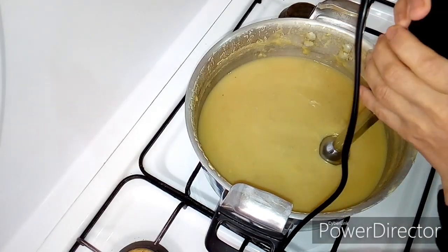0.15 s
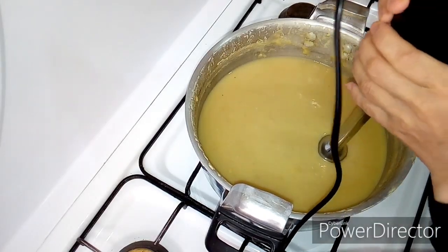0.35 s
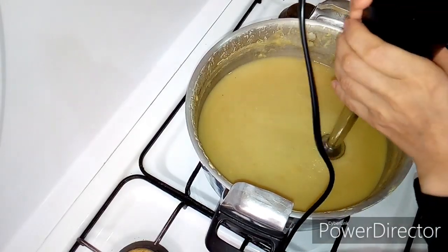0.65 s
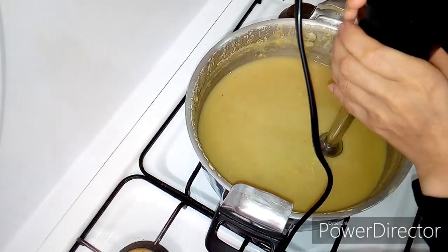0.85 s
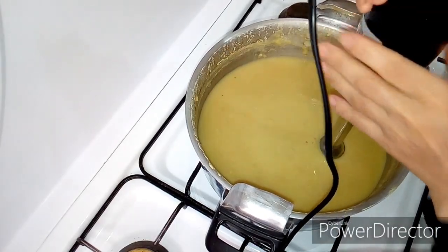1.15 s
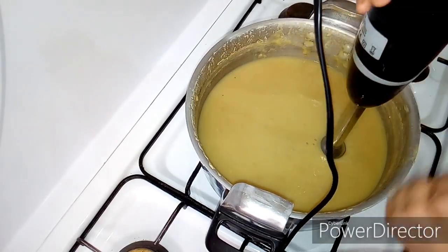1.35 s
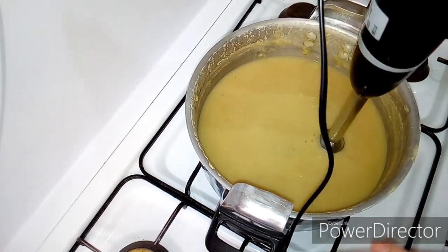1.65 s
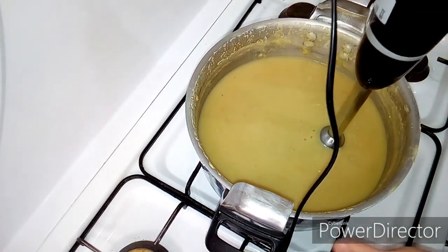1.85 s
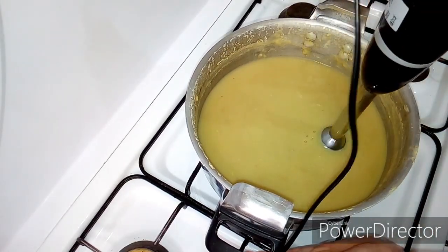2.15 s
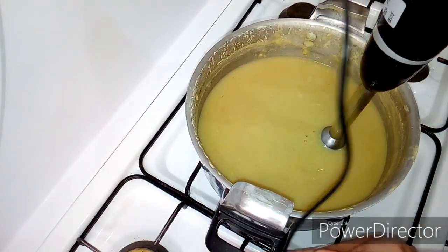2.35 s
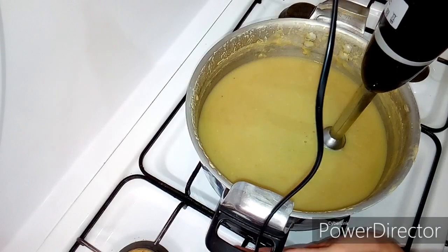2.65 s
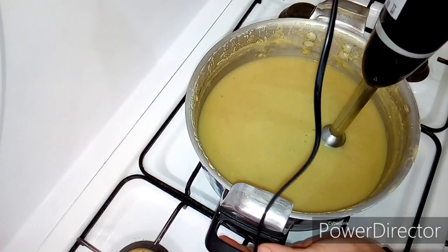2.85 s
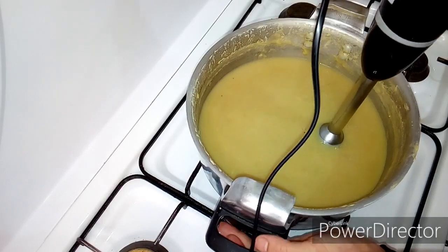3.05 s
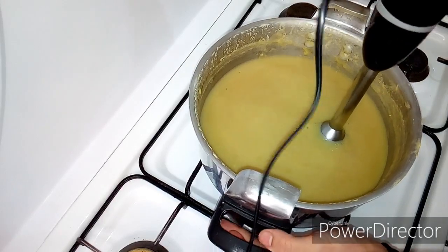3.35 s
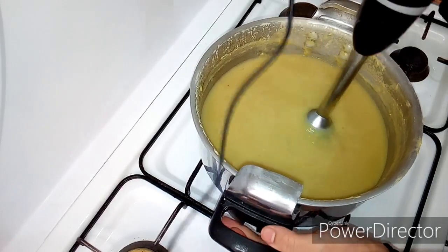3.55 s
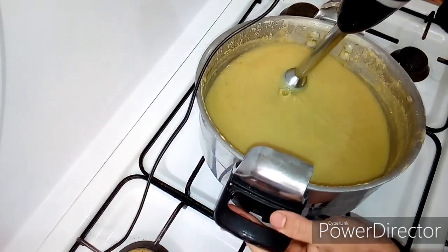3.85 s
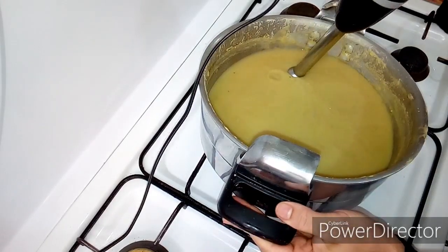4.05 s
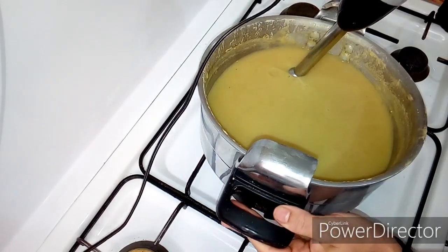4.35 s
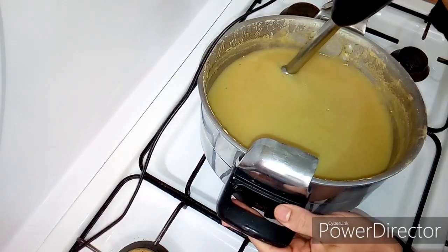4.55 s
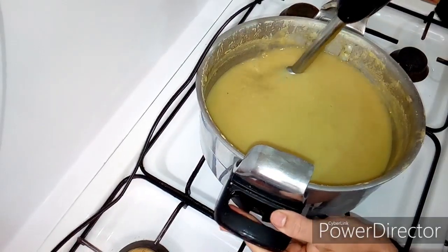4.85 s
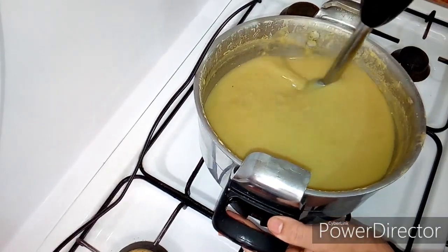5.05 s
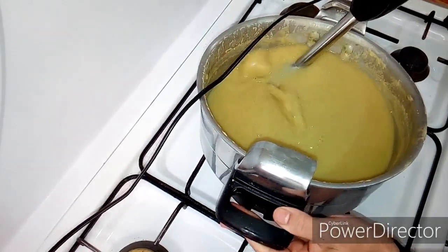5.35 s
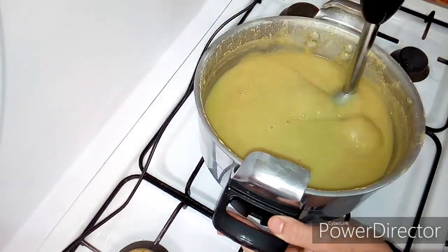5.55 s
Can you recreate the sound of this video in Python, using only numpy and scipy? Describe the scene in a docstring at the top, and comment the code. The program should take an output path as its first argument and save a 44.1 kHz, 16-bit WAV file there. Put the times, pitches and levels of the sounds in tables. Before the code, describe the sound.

At the very start, two quick knocks sound as a stick blender whines up to speed in a steel pot of thick puree, close by in a home kitchen. The buzzing, slightly rattly motor switches off at about 0.8 seconds and coasts down, falling in pitch and fading by about 1.5 seconds. A faint hiss and low electrical hum remain. From about 2.2 to 4 seconds, a hand takes hold of the pot with soft bumps, small metallic ticks and light rubs. At about 4.1 seconds the switch snaps and the blender starts again, lower and less even in pitch. A wet churning builds from around 4.4 seconds as the blade works deep in the puree. At about 5.1 seconds the blender hits the pot in a quick cluster of loud knocks, and the sound ends abruptly at 5.2 seconds.

```python
"""With two quick knocks a stick blender whines up to speed in a steel pot of bean puree, then coasts down.
A hand takes hold of the pot with small ticks and bumps over kitchen hiss and a faint mains hum.
Pushed deep, the blender starts again, churns and knocks against the pot until the sound ends abruptly.
The whine is the harmonic series of one push per shaft turn; bearings and brushes add noise pulsed at
the same rate, and collapsing air pockets excite the modes of the pot."""
import sys
import numpy as np
from scipy import signal
from scipy.fft import rfft, irfft
from scipy.io import wavfile

SR = 44100
rng = np.random.default_rng(int(sys.argv[2]) if len(sys.argv) > 2 else 0)


def waveform_to_disk(signal):
    """Save audio, clipped to [-1, 1], as 16-bit WAV at the path in sys.argv[1]."""
    frames = np.transpose(np.atleast_2d(signal))
    scaled = np.clip(frames, -1, 1) * 32767
    samples = np.round(scaled).astype(np.int16)
    wavfile.write(sys.argv[1], SR, samples)


N = 251325
T = np.arange(N) / SR
OFF_S, RESTART_S = .8, 4.062  # the first run is switched off, the second on
FREE_FULL_S, DEEP_FULL_S = (.5, .8), (4.3, 5.1)  # each run's stretch at full speed
RATTLE_KNEE_HZ, HISS_KNEE_HZ = 126.7, 166  # shaft speeds below which these noises die away
HUM_HZ, HUM_WAVER_DB = 100, 1.8  # twice the mains frequency; spread of the hum's level


def undb(db):
    """Decibels to amplitude ratio."""
    return 10 ** (np.asarray(db) / 20)


def unit(x):
    """Normalisation to rms 1."""
    return x / np.sqrt(np.mean(x ** 2))


def steady(x, span):
    """Normalisation to rms 1 within a span of time."""
    return x / np.std(x[(T > span[0]) & (T < span[1])])


def curve(rows):
    """Linear interpolation between (seconds, value) points."""
    return np.interp(T, *np.transpose(rows))


def onset(start, length):
    """Linear ramp from 0 to 1, then held."""
    return np.clip((T - start) / length, 0, 1)


def swell(s, half):
    """Gaussian envelope centred on s, with a standard deviation of half seconds."""
    return np.exp(-((T - s) / half) ** 2 / 2)


def decay(start, t60):
    """Exponential decay of a damped vibration after a blow."""
    return (T >= start) * np.exp(-np.log(1000) * np.clip((T - start) / t60, 0, 2))


def knee(speed, hz, slope):
    """Gain that is level at high speed and falls as a power law below the knee."""
    return 1 / (1 + (hz / speed) ** slope)


def noise():
    """Gaussian white noise."""
    return rng.standard_normal(N)


def walk(rate):
    """Random wander through rate points a second, with a spread near 1."""
    return np.interp(T * rate, np.arange(N), noise()) * 1.2


def colour(x, points):
    """Minimum-phase filter of unit power gain, shaped by (Hz, relative dB) points."""
    hz, db = np.transpose(points)
    grid = np.linspace(1, SR / 2, 2049)
    grid_db = np.interp(np.log(grid), np.log(np.append(hz, SR / 2)), np.append(db, db[-1] - 31))
    cepstrum = irfft(np.log(undb(grid_db)))
    causal_fold = 1 + np.sign(np.fft.fftfreq(len(cepstrum)))
    response = irfft(np.exp(rfft(cepstrum * causal_fold)))
    return signal.fftconvolve(x, response / np.linalg.norm(response))[:N]


def resonance(x, hz, width):
    """Second-order resonator with gain 1 at its centre."""
    return signal.lfilter(*signal.iirpeak(hz, hz / width, fs=SR), x)


def narrow(x, hz, width):
    """Two resonators in cascade, for steeper skirts."""
    return resonance(resonance(x, hz, width), hz, width)


def kitchen():
    """Noise floor: broadband hiss, faint narrow-band whistles and wavering harmonics of the mains."""
    # Each row: frequency in Hz, relative level of the hiss in dB.
    air_spectrum = [(25, -15), (65, -15), (95, 0.5), (130, -9.5), (250, -8.5), (500, -7), (900, -8),
                    (1900, -12), (3200, -12.5), (4500, -11), (6000, -15.5), (7500, -24.5), (10000, -26.5),
                    (15500, -27)]
    # Each row: centre in Hz, width in Hz, level in dB once faded in.
    whistle_bands = [(2748, 180, -74), (4510, 250, -81.5)]
    # Each row: frequency in Hz, level in dB before the hum's swell is applied.
    hum_partials = [(100, -75), (199.5, -74.5), (300, -75), (399, -74), (500, -85.5), (798, -81)]
    dip_db = 2.4 * swell(2.56, 0.32)
    air = colour(noise(), air_spectrum) * undb(-64 - dip_db + .5 * walk(8))
    whistles = sum(undb(db) * unit(narrow(noise(), hz, width)) for hz, width, db in whistle_bands)
    hum = sum(undb(db + HUM_WAVER_DB * walk(3.3)) * np.sin(2 * np.pi * hz * T + 0.73 * walk(21))
              for hz, db in hum_partials)
    return air + whistles * onset(0, 3.2) + np.sqrt(2) * hum * (0.34 + swell(2.95, .42))


def room(x, wet_db, t60):
    """Reverberation: the tiled kitchen adds a short diffuse tail, mostly treble."""
    tail = resonance(noise() * decay(0.0059, t60), 3700, 5800)[:SR // 2]
    return x + undb(wet_db) * signal.fftconvolve(x, tail / np.linalg.norm(tail))[:N]


def reflect(x, wall, stove):
    """Comb filtering: treble reflected by pot wall and stove top interferes, shifting as the hand sways."""
    wall_s, stove_s, sway = 0.000771, 0.0021, .12
    treble = signal.sosfilt(signal.butter(1, 2000, "high", fs=SR, output="sos"), x)
    late = [np.interp(T - delay * (1 + sway * walk(2.5)), T, treble) for delay in (wall_s, stove_s)]
    return (x + wall * late[0] + stove * late[1]) / np.sqrt(1 + wall ** 2 + stove ** 2)


def handling():
    """Impact and friction: a hand bumps the handle, cord and pot tick, hand and cord slide."""
    # Each row: start in seconds, level in dB, t60 in seconds.
    bumps = [(2.225, -58.5, 0.12), (2.452, -55.5, 0.088), (2.542, -57, 0.18), (3.253, -49.5, 0.089),
             (3.299, -52, 0.14), (3.345, -52.5, 0.25), (3.382, -49.5, 0.23), (3.409, -52, 0.31),
             (4.002, -49.5, 0.07)]
    # Each row: frequency in Hz, relative level in dB.
    bump_spectrum = [(100, -17.5), (250, -14), (410, 2), (520, -11), (800, -19), (1500, -23.5), (4000, -56)]
    # Each row: start in seconds, peak in dB before the low-pass, centre and width in Hz, t60 in seconds.
    ticks = [(2.45, -38, 2660, 5500, 0.022), (2.479, -48, 5500, 493, .03), (2.543, -54, 2400, 1500, 0.044),
             (2.9559, -25, 5010, 1040, 0.0075), (3.737, -29, 5150, 1194, 0.028),
             (3.741, -33, 4150, 3200, 0.02), (4.012, -47, 4060, 2510, 0.064)]
    # Each row: middle in seconds, level in dB before the low-pass, half length in seconds, centre in Hz.
    rubs = [(2.874, -66.5, .03, 4900), (3.078, -60.5, 0.03, 4130), (3.447, -59, 0.031, 3650),
            (3.78, -60, 0.043, 4970)]
    out = colour(noise() * sum(undb(db) * decay(s, t60) for s, db, t60 in bumps), bump_spectrum)
    for s, db, hz, width, t60 in ticks:
        tick = narrow(noise() * decay(s, t60), hz, width)
        steel_ring = narrow(noise() * decay(s, t60=0.38), hz=5250, width=1000)
        out += undb(db) * (tick / np.abs(tick).max() + undb(-22.5) * steel_ring / np.abs(steel_ring).max())
    for s, db, half, hz in rubs:
        out += undb(db) * unit(resonance(noise(), hz, width=1900)) * swell(s, half)
    return signal.sosfilt(signal.butter(4, 6800, fs=SR, output="sos"), out)


def knocks():
    """Impulsive excitation: the guard hits the pot, the motor kicks, and the switch snaps and rings."""
    # Each row: start in seconds, level in dB, t60 in seconds.
    impacts = [(.006, -27, 0.038), (0.042, -24, 0.045), (4.08, -32.5, 0.036), (4.12, -34, 0.044),
               (5.077, -21.5, 0.018), (5.0941, -10, 0.015), (5.1024, -8, 0.061), (5.133, -11.5, 0.055),
               (5.18, -11.5, 0.012)]
    # Each row: frequency in Hz, relative level in dB.
    impact_spectrum = [(60, -45), (150, -19.5), (500, -3), (1000, -2.5), (1600, 7.5), (2000, 1.5),
                       (3000, -3), (4000, -8.5), (5500, -0.5), (7000, -12), (9000, -28), (15000, -32)]
    # Each row: frequency in Hz, relative level in dB, t60 in seconds.
    switch_modes = [(209, 0.5, 0.16), (524, 0, 0.083), (595, 1.5, 0.12), (1150, -28, 0.027),
                    (2430, -5, 0.06), (2725, -1, 0.038), (4840, -2, 0.031)]
    blows = colour(noise() * sum(undb(db) * decay(s, t60) for s, db, t60 in impacts), impact_spectrum)
    ring = sum(undb(db) * np.sin(2 * np.pi * hz * (T - RESTART_S)) * decay(RESTART_S, t60)
               for hz, db, t60 in switch_modes)
    crack = undb(-4) * colour(noise() * decay(RESTART_S, 0.021), impact_spectrum)
    return blows + undb(-32.5) * (ring + crack)


def shaft(speed, wobble, ripple):
    """Phase in turns: the integral of a wavering speed, nudged by each half wave of the mains."""
    mains = np.sin(2 * np.pi * HUM_HZ * T)
    return np.cumsum(speed * (1 + wobble * walk(70))) / SR + ripple * mains


def beat(turns, scatter_db):
    """Harmonic pulse train: one push of random size per turn, slightly smeared to sound less spiky."""
    pulses = sum(np.cos(2 * np.pi * k * turns - k * k / 7) for k in range(1, 24))
    return pulses * undb(scatter_db * noise()[(turns + .25).astype(int)])


def rattle(turns, depth, decay_turns, scatter_db):
    """Amplitude modulation: noise flares once a turn, as when the shaft slaps its bearings."""
    flare = np.exp(-(turns % 1) / decay_turns) * undb(scatter_db * noise()[turns.astype(int)])
    return unit(noise() * (1 + depth * flare))


def brush_hiss(speed, turns, modes, ring_db):
    """Sliding friction: carbon brushes scrape once a turn and ring the steel shaft and guard."""
    # Each row: frequency in Hz, relative level in dB.
    scrape_spectrum = [(4000, -24.5), (7000, 4.5), (9000, -0.5), (10200, -4.5), (11500, -2), (13000, -7.5),
                       (14200, -7), (15500, -10)]
    scrape = rattle(turns, depth=1.5, decay_turns=.3, scatter_db=3.5)
    ring = sum(undb(db) * unit(narrow(scrape, hz, max(width, 350))) for hz, width, db in modes)
    hiss = unit(colour(scrape, scrape_spectrum) + undb(ring_db) * unit(np.roll(ring, 200)))
    return hiss * knee(speed, HISS_KNEE_HZ, slope=6)


def free_speed():
    """Shaft speed in Hz: an exponential run-up and slow creep, then braking by drag and dry friction."""
    start_hz, full_hz, creep_hz_per_s, run_up_s = 115.35, 251.2, 12, .13
    drag_s, friction_hz = .44, 35.53
    powered, coasted = np.minimum(T, OFF_S), np.maximum(T - OFF_S, 0)
    driven = full_hz + creep_hz_per_s * powered - (full_hz - start_hz) * np.exp(-powered / run_up_s)
    return np.maximum((driven + friction_hz) * np.exp(-coasted / drag_s) - friction_hz, 1)


def free_whine(speed, turns):
    """Forced vibration: the shaft's beat drives the housing, and its unbalance hums once per turn."""
    # Each row: frequency in Hz, relative gain of the housing in dB.
    housing_response = [(90, -32), (180, -14), (260, -13), (320, -19), (410, -11), (600, -12), (780, -11),
                        (1040, -1.5), (1300, 0), (1560, 0), (1820, -2.5), (2080, -12), (2340, -7),
                        (2650, -17), (3100, -12), (4300, -12), (7000, -38)]
    # Each row: centre in Hz, width in Hz, gain in dB at the height of the lurch.
    coast_modes = [(169.5, 23, -44), (425, 84, -23), (517, 100, -18.5), (563, 200, -27.5),
                   (1030, 110, -23.5), (3030, 450, -26.5)]
    pushes = beat(turns, scatter_db=0.5)
    housing = steady(colour(pushes, housing_response), FREE_FULL_S)
    housing += undb(-4) * steady(narrow(pushes, hz=528, width=60), FREE_FULL_S)
    top_speed_db = 11 * np.exp((speed - speed.max()) / 15)
    whine = housing * undb(-30.5 + top_speed_db) * knee(speed, hz=148.5, slope=4.1)
    unbalance = undb(-38 + 2 * walk(25)) * np.sqrt(2) * np.sin(2 * np.pi * turns)
    # after switch-off the motor lurches and its falling partials sweep through the modes
    rise_s, t60 = .11, 0.48
    lurch = sum(undb(db) * narrow(pushes, hz, width) for hz, width, db in coast_modes)
    lurch *= onset(OFF_S, rise_s) * undb(-60 * np.maximum(T - OFF_S - rise_s, 0) / t60)
    return whine + unbalance * knee(speed, hz=162.6, slope=14) + lurch


def free_run():
    """Rotor noise at light load: near the surface, shaft speed governs whine, rattle and brush hiss."""
    # Each row: frequency in Hz, relative level in dB.
    bearing_spectrum = [(30, -20.5), (80, -28.5), (140, -14), (300, -13.5), (560, -2), (760, -4), (1400, 3),
                        (2000, -2), (2550, -2.5), (3100, -2), (3700, -3), (4300, 0), (5700, -3),
                        (8200, -27)]
    # Each row: centre in Hz, width in Hz, level in dB, shaft speed in Hz at which it rings most.
    housing_modes = [(685, 52, -35, 226), (1397, 310, -31.5, 238), (2204, 220, -35, 243),
                     (4260, 520, -29, 260)]
    # Each row: multiple of the shaft speed, level in dB at top speed.
    commutator_bands = [(12, -34), (16, -34), (40, -57.5), (47, -59.5), (50, -52)]
    # Each row: centre in Hz, width in Hz (raised to at least 350), relative level in dB.
    steel_modes = [(8550, 250, -3), (9940, 140, -0.5), (9890, 48, 8), (11300, 84, -14), (12300, 230, -4),
                   (13000, 95, -3)]
    speed = free_speed()
    # the slower the shaft, the less evenly it turns, above all when it coasts
    wobble = .0006 + (.08 + .13 * onset(OFF_S, .2)) * (1 - speed / speed.max()) ** 1.5
    turns = shaft(speed, wobble, ripple=0.0092)
    slaps, knocking = (rattle(turns, depth=1.7, decay_turns=0.11, scatter_db=2.4) for _ in range(2))
    near_top = np.exp((speed - speed.max()) / 30)
    bearings = colour(slaps, bearing_spectrum) * knee(speed, RATTLE_KNEE_HZ, slope=7.2)
    bearings *= undb(-23.5 - 0.55 * near_top)  # the shaft centres itself at top speed
    rings = sum(undb(db) * steady(narrow(knocking, hz, width), FREE_FULL_S)
                * np.exp(-((speed - best_hz) / 11) ** 2 / 2) for hz, width, db, best_hz in housing_modes)
    song = sum(undb(db) * unit(np.cos(2 * np.pi * k * turns) * walk(400)) for k, db in commutator_bands)
    hiss = brush_hiss(speed, turns, steel_modes, ring_db=-10)
    hiss *= undb(-43 - 6 * onset(OFF_S, 0.19))  # brushes are quieter without current
    shudder = undb(-41) * unit(narrow(knocking, hz=180.5, width=146)) * swell(OFF_S + 0.24, 0.0539)
    noises = reflect(bearings + hiss, wall=0.24, stove=0.066) + rings + song * near_top + shudder
    return onset(0, .05) * (free_whine(speed, turns) + noises)


def air_pockets():
    """Shot noise: air pockets collapse at random and excite the modes of pot and puree."""
    # Each row: centre in Hz, width in Hz, relative gain in dB.
    pot_modes = [(290, 49, -5.5), (413, 47, 0), (484.5, 19, 10.5), (588, 90, -3.5), (663, 91, -4),
                 (771, 76, 1), (970, 450, -16), (1136, 110, -6.5)]
    pockets_per_s = 2600
    pops = noise() * (rng.random(N) < pockets_per_s / SR) * undb(1.4 * walk(35))
    # a random time shift gives each mode its own strikes
    ringing = sum(undb(db) * resonance(np.roll(pops, rng.integers(N)), hz, width)
                  for hz, width, db in pot_modes)
    return unit(colour(ringing, [(60, -35), (200, -2.5), (380, -8), (1200, -1.5), (2500, -2.0)]))


def deep_run():
    """Rotor noise under load: the buried blade turns slower and less evenly, and churns the puree."""
    # Each row: time in seconds, shaft speed in Hz.
    shaft_speeds = [(4.06, 58.1), (4.15, 163), (4.218, 202), (4.378, 206), (4.45, 210), (4.634, 205),
                    (4.742, 207), (5.18, 203)]
    # Each row: time in seconds, level of the churning in dB.
    churn_levels = [(4.08, -41), (4.2, -36), (4.35, -28.5), (4.43, -23), (4.92, -21.5), (4.98, -24),
                    (5.045, -18.5), (5.1, -24.5), (5.18, -20)]
    # Each row: frequency in Hz, relative gain of the housing in dB.
    housing_response = [(90, -9), (208, 1), (300, -18), (415, 1), (620, -4.5), (820, -18.5), (1100, 2),
                        (1500, -9.5), (2500, -19.5), (5000, -26), (8000, -44.5)]
    # Each row: frequency in Hz, relative level in dB.
    bearing_spectrum = [(30, -16.5), (70, -20), (150, -11.5), (280, -4.5), (500, -10), (900, 5), (1400, 10),
                        (2300, 2.5), (3600, 3.5), (4500, 1), (5500, 1), (6500, -7.5), (8200, -21.5)]
    # Each row: centre in Hz, width in Hz (raised to at least 350), relative level in dB.
    steel_modes = [(8840, 130, 0.5), (10770, 200, -2), (11980, 370, -5.5), (12964, 70, -3.5),
                   (13730, 98, -3.5), (14230, 46, -10)]
    # Each row: centre in Hz, width in Hz, level in dB at full load.
    load_modes = [(487, 59, -32), (798.5, 74, -28), (5293, 440, -30), (12350, 900, -58.5)]
    speed, churning = curve(shaft_speeds), undb(curve(churn_levels))
    load = churning / churning.max()
    turns = shaft(speed, wobble=0.018, ripple=0.013)
    whine = steady(colour(beat(turns, scatter_db=2.3), housing_response), DEEP_FULL_S) * load ** 0.76
    drawing_air = onset(4.86, .12)
    whine *= undb(-25.5 - 8.5 * drawing_air + 2.5 * walk(21))
    slaps = rattle(turns, depth=0.32, decay_turns=.25, scatter_db=5)
    bearings = colour(slaps, bearing_spectrum) * knee(speed, RATTLE_KNEE_HZ, slope=6.5)
    bearings *= undb(-23.5 - 0.86 * load)
    hiss = brush_hiss(speed, turns, steel_modes, ring_db=0.5) * undb(-49 - 1.2 * load)
    rings = sum(undb(db + 2 * walk(4.3)) * unit(narrow(np.roll(slaps, rng.integers(N)), hz, width))
                for hz, width, db in load_modes)
    churn = air_pockets() * churning
    motor_hum = undb(-54.5 + HUM_WAVER_DB * walk(11)) * np.sin(2 * np.pi * HUM_HZ * T)
    noises = reflect(bearings + hiss, wall=0.15, stove=0.29) + rings * load
    return onset(RESTART_S, 0.025) * (whine + motor_hum + churn + noises)


def scene():
    """Superposition of both runs, the handling between them and the kitchen, in one channel."""
    blender = room(free_run() + deep_run() + knocks(), wet_db=-14, t60=0.43)
    return (blender + room(handling(), wet_db=-16, t60=0.14) + kitchen())[None]


def record(dry):
    """Soft saturation rounds the peaks, a fast fade ends the sound and a low-pass cuts the top."""
    peak_limit, stop_s, top_hz = .85, 5.188, 15550
    rounded = dry / (1 + (dry / peak_limit) ** 4) ** .25
    fade = np.clip((stop_s - T) / .009, 0, 1)
    return signal.sosfilt(signal.ellip(10, .2, 80, top_hz, fs=SR, output="sos"), rounded * fade)


dry = scene()
out = record(dry)
waveform_to_disk(out)
```